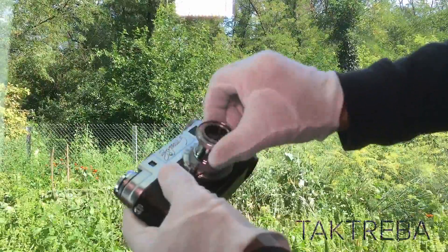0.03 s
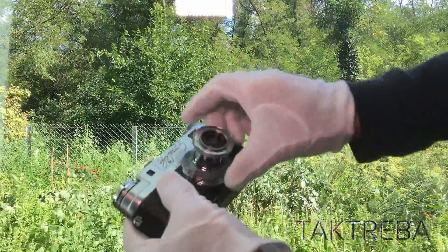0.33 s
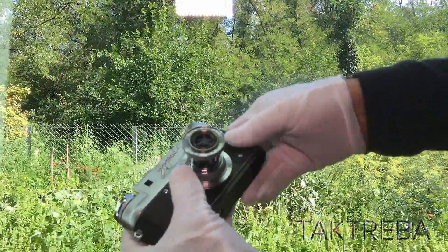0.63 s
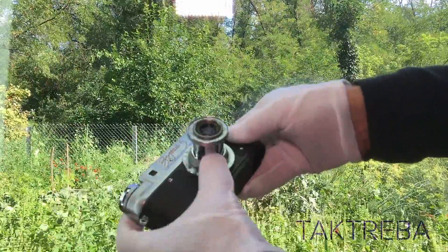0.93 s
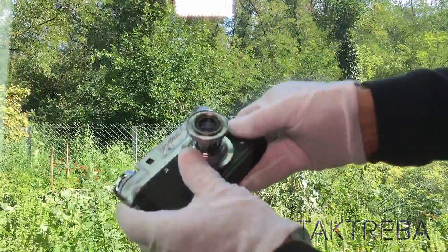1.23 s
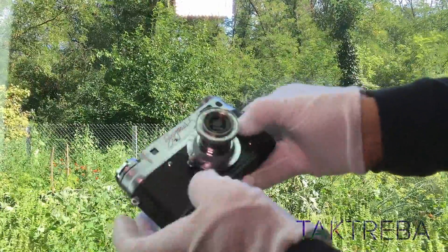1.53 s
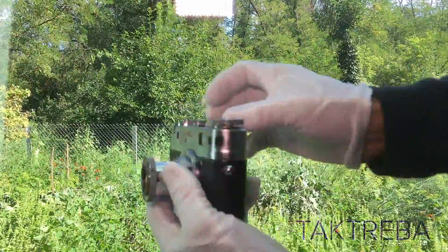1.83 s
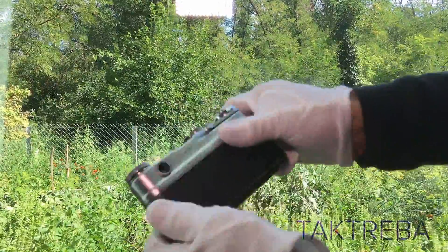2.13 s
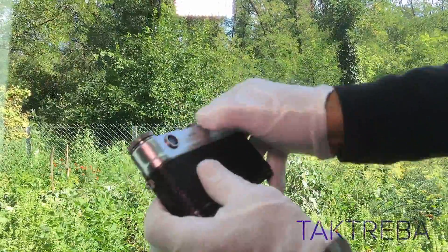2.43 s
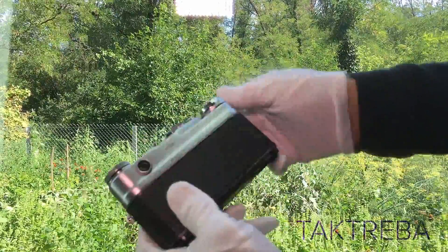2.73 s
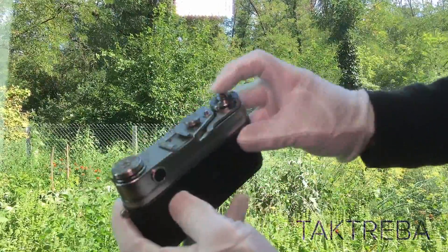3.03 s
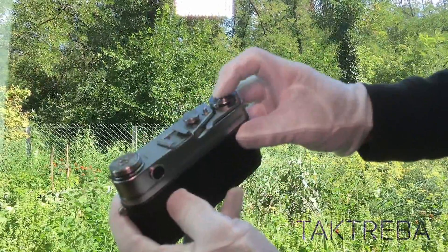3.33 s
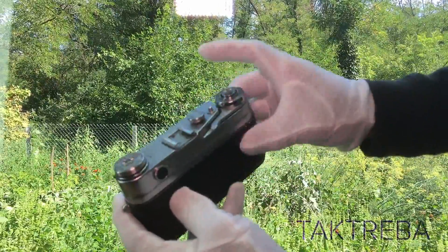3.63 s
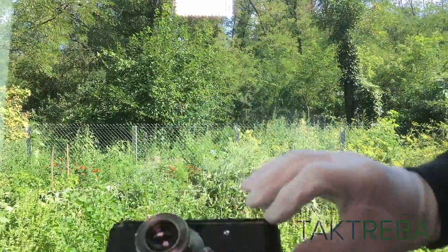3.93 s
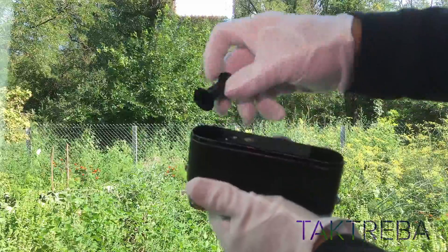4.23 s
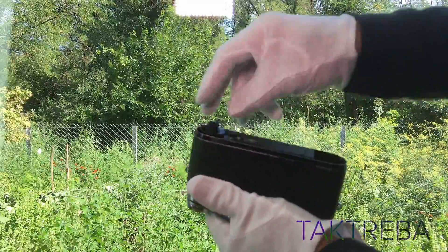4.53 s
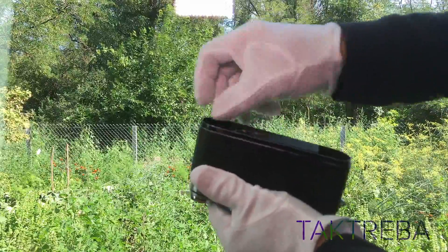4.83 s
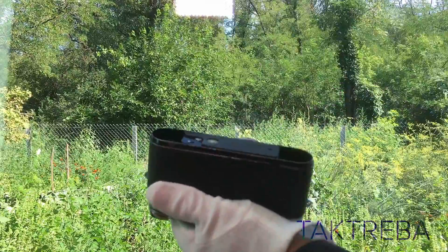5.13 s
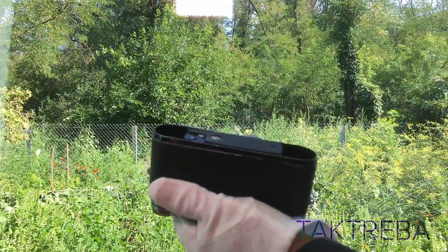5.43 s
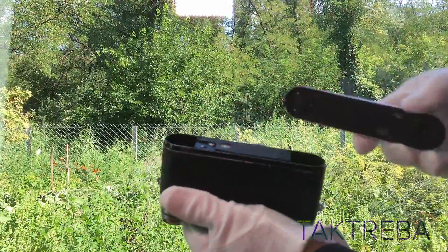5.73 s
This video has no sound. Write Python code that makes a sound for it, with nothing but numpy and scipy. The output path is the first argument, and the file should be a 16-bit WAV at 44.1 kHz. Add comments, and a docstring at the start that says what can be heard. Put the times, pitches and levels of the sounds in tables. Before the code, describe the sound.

An old metal film camera is handled close to the microphone in a small, fairly dry room, over faint hiss and low rumble. Right at the start the lens locks with a loud, sharp metallic click, followed by a smaller one at 0.2 seconds. Until 2.5 seconds there are only light taps and faint rustles of cotton gloves. At 2.5 seconds the rewind knob pulls out with a brief, swelling rasp. It snaps at about 2.9, 3.2 and 3.6 seconds, each a quick grinding double click, the first loudest and the last softest. After a small tap and more rustling, a spool rattles into the open body in several light, ringing clacks from 4.4 to 4.9 seconds. Around 5.2 seconds a hand softly bumps the table, and the thin base plate slides with a quiet judder and tiny squeaks, lifting with a faint tick and scrape at 5.8 seconds.

```python
"""In a small room, close to the microphone, gloved hands work an old metal film camera.
The lens locks, the rewind knob rasps out and snaps up and down, and a take-up spool rattles into the
open body: impacts and friction excite the resonant modes of the metal. The base plate is slid off a
table, juddering and squeaking by stick-slip. Cotton gloves rustle over a faint hiss and rumble."""
import sys
import numpy as np
from scipy import signal
from scipy.fft import rfft, irfft, next_fast_len
from scipy.io import wavfile

SR = 44100
rng = np.random.default_rng(int(sys.argv[2]) if len(sys.argv) > 2 else 0)


def persist_wave(psi):
    """Save psi, clipped to +-1, as 16-bit WAV."""
    counts = np.round(np.clip(psi, -1, 1) * 32767).astype(np.int16)
    wavfile.write(sys.argv[1], SR, np.atleast_2d(counts).T)


N = 258867
TIME = np.arange(N) / SR

# spectra of the background hiss and rumble: frequency_hz, density_db
HISS_SPECTRUM = [(53, -28.5), (90, -5.5), (151, -4.5), (316, -7.5), (419, -8.5), (457, -6.5), (532, -13),
                 (593, -9), (935, -9), (1410, -13.5), (1680, -14.5), (2090, -18.5), (2320, -20),
                 (4960, -24), (16000, -31.5)]
RUMBLE_SPECTRUM = [(18, -7), (32, 1.5), (55, -0.5), (80, -10), (130, -23.5), (250, -52)]
# course of the rumble: time_s, level_db
RUMBLE_LEVELS = [(0.0, -67), (0.5, -59), (0.72, -64), (2.14, -65), (2.42, -58), (3.56, -56), (3.63, -60),
                 (4.48, -67), (5.87, -62)]

# blows of the locking lens, light taps on the closed camera, and loose spool and base plate touching:
# time_s, level_db, weight_db, hardness_db, ring_hz
# (the level is that of the body range; weight and hardness set the knock and tick ranges against it)
LENS_BLOWS = [(0.037, -26.2, -7.5, -15, 1220), (0.214, -48, -12, -31, 2530), (0.234, -58, -5, -27, 1230)]
TAP_BLOWS = [(0.63, -67, 4, 5, 4100), (1.342, -54, -30, -36, 3600), (1.862, -64.5, -5, -7, 4800),
             (1.947, -52.5, -30, 1, 3340), (2.501, -55.5, -22, -2, 1810), (2.854, -53, -15, 15, 6500),
             (3.906, -51, -14, -17, 1490)]
LOOSE_BLOWS = [(4.356, -38.3, -14, -13, 2150), (4.425, -61, -5, -16, 1220), (4.448, -57.5, -22, -19, 3500),
               (4.497, -37, -17.5, .5, 1860), (4.525, -48.5, -14, 3, 1490), (4.708, -49, -11, -3, 2190),
               (4.727, -43, -10.5, -15, 4500), (4.744, -57, -15, -4, 1560), (4.91, -41.3, -10, -3.5, 1650),
               (5.795, -57.5, -6, -15, 1930)]
# bounds of a blow's knock, body, clack and tick ranges: edge_hz
RANGE_EDGES_HZ = [220, 1050, 2500, 7000, 16000]

# resonances of the lens barrel, closed camera, knob shaft, grinding knob, open body with its spool,
# and base plate: pitch_hz, width_hz, gain_db
LENS_MODES = [(526, 74, 5), (740, 470, 8), (1216, 57, 7), (1620, 300, 10), (2220, 330, -6.5),
              (2880, 640, 8.5), (3720, 140, -16), (4160, 430, 11.5), (5030, 900, -2)]
CAMERA_MODES = [(501, 44, 4), (690, 80, 12.5), (784, 45, 3.5), (1220, 42, 6), (1570, 140, 6.5),
                (2100, 90, 6), (2507, 140, -3), (3060, 210, 7), (4300, 350, 6.5), (4980, 300, -12.5),
                (6650, 450, 3), (8910, 380, 7.5), (12700, 1900, 8.5)]
SHAFT_MODES = [(1250, 82, 1.5), (1680, 46, 6.5), (4070, 110, 5.5), (5000, 450, -17), (5650, 510, 11),
               (8960, 1100, 8.5)]
GRIND_MODES = [(6500, 400, 8), (8700, 500, 4)]
OPEN_BODY_MODES = [(532, 18, 6), (630, 52, 15.5), (879, 26, 12), (1177, 53, 7), (1538, 70, 9),
                   (1675, 44, 3.5), (1766, 26, 9), (3470, 73, 3.5), (3730, 410, 8), (4450, 260, 8),
                   (5120, 470, -9), (6160, 300, 1.5), (9360, 780, 3.5), (11500, 700, 5)]
PLATE_MODES = [(300, 24, 10), (373, 30, 11), (619, 14, 21), (800, 26, 23), (1700, 150, 3.1),
               (2680, 300, 6.1)]
# friction spectra of the gloves, rasping shaft, grinding knob and dragged plate: frequency_hz, density_db
GLOVE_SPECTRUM = [(900, 0), (2000, -0.5), (3800, 0.5), (5000, -1), (6500, -0.5), (9000, -1.5), (10500, 0),
                  (13000, 1), (16000, -6.5)]
RASP_SPECTRUM = [(290, -56), (500, -26), (649, -9), (974, -7), (1380, 0), (2500, -9), (4030, -3),
                 (5020, -11), (5630, -12.5), (9360, -5), (16000, -6)]
GRIND_SPECTRUM = [(400, -19.5), (1300, -1.5), (2500, -4), (6000, -1), (10000, -5), (15000, -3)]
DRAG_SPECTRUM = [(150, -9), (300, 2), (700, -14), (1200, -7), (2700, -12), (4500, -17.5), (9000, -36)]

# glove strokes over metal and leatherette, and two tugs on the plate: middle_s, length_s, level_db
GLOVE_STROKES = [(0.54, .1, -69), (1.162, .03, -66.5), (1.8, .25, -73), (2.098, .045, -61.5),
                 (2.23, .17, -68), (3.028, .06, -68), (3.79, .08, -65), (4.0, .12, -71),
                 (4.185, .06, -63.5), (5.254, .015, -61.5), (5.331, .036, -66), (5.667, .02, -62.5)]
PLATE_TUGS = [(5.303, .04, -58), (5.45, .085, -59)]
# the shaft leaving its sleeve, and the plate's rim leaving the table: start_s, end_s, first_db, last_db
SHAFT_PULL = (2.515, 2.655, -56.5, -42)
RIM_LIFT = (5.805, 5.85, -60.5, -68)
# pushes of the rewind knob: unlatch_s, stop_s, unlatch_db, first_grind_db, last_grind_db, stop_db,
# contact_s, weight_db, hardness_db, ring_hz
KNOB_PUSHES = [(2.831, 2.881, -49.5, -48, -32, -24.8, .0056, -11, -3, 1215),
               (3.202, 3.229, -40.5, -38, -49, -29, .006, -15.5, -1.5, 1440),
               (3.544, 3.576, -49, -48, -41, -35.3, .011, -6.5, -5, 1290)]
# squeaks of the plate's edge: middle_s, length_s, level_db, pitch_hz
EDGE_SQUEAKS = [(5.29, .05, -66.5, 2670), (5.368, .012, -60.5, 2690), (5.455, .06, -65.5, 2540)]

# reverberation time of the room: frequency_hz, t60_s
ROOM_T60 = [(500, 0.092), (1500, 0.15), (4000, 0.17), (8000, 0.14), (15000, .11)]
# spectrum of its reflections: frequency_hz, gain_db
ROOM_SPECTRUM = [(300, 6), (750, 5), (1250, 0), (2000, 0), (4300, -3), (7000, -2), (13000, -5.5)]
# notches of the microphone's housing: frequency_hz, width_hz, gain_db
MICROPHONE_DIPS = [(5040, 370, -2), (10500, 660, -2)]


def from_db(db):
    """Amplitude grows tenfold for every 20 decibels."""
    return 10 ** (np.asarray(db) / 20)


def unit_rms(x):
    """Normalisation to unit power."""
    return x / np.sqrt(np.mean(x ** 2) + 1e-20)


def at_hz(points, hz):
    """Interpolation on a logarithmic frequency axis."""
    frequencies, values = np.transpose(points)
    return np.interp(np.log(hz + 1e-9), np.log(frequencies), values)


def band(x, low_hz, high_hz, order=3):
    """Causal band-pass filtering."""
    sections = signal.butter(order, [low_hz, high_hz], "band", fs=SR, output="sos")
    return signal.sosfilt(sections, x + 1e-18)


def coloured(x, spectrum):
    """Spectral shaping: each frequency is weighted by a smooth gain curve."""
    size = next_fast_len(len(x), True)
    gain = from_db(at_hz(spectrum, np.arange(size // 2 + 1) * SR / size))
    return irfft(rfft(x, size) * gain, size)[:len(x)]


def resonate(x, modes):
    """Resonance: each mode lifts or cuts a narrow range and rings for about 2 / width_hz seconds."""
    for pitch_hz, width_hz, gain_db in modes:
        damp = np.pi * width_hz / SR
        turn = -2 * np.cos(2 * np.pi * pitch_hz / SR)
        lift = damp * from_db(gain_db)
        x = signal.lfilter([1 + lift, turn, 1 - lift], [1 + damp, turn, 1 - damp], x + 1e-18)
    return x


def wander(low_hz, high_hz):
    """Random modulation: band-limited noise of unit spread."""
    return unit_rms(band(rng.standard_normal(N), low_hz, high_hz, order=2))


def friction(per_s, spread_db, size=N):
    """Friction as a Poisson process: surfaces catch at random moments with uneven strength."""
    caught = rng.random(size) < per_s / SR
    direction = rng.choice([-1, 1], size)
    strength = from_db(spread_db * np.clip(rng.standard_normal(size), -2, 2))
    return unit_rms(caught * direction * strength)


def slide(start_s, end_s, first_db, last_db, attack_s, release_s):
    """Exponential envelope of a sliding move, with linear onset and release."""
    gate = np.interp(TIME, [start_s - attack_s, start_s, end_s, end_s + release_s], [0, 1, 1, 0])
    return gate * from_db(np.interp(TIME, [start_s, end_s], [first_db, last_db]))


def swells(strokes):
    """Incoherent addition: the Gaussian envelopes of strokes sum in power."""
    return np.sqrt(sum(from_db(level_db) ** 2 * 2 ** -((2 * (TIME - middle_s) / length_s) ** 2)
                       for middle_s, length_s, level_db in strokes))


def small_part_modes(width_share, spread_db, count):
    """High-order modes of springs, screws and thin plates: treble peaks and dips of constant Q."""
    pitches_hz = np.linspace(5300, 15000, count) + rng.uniform(-90, 90, count)
    return [(hz, width_share * hz, spread_db * (-1) ** k) for k, hz in enumerate(pitches_hz)]


def impacts(blows, modes, fine_modes, contact_s, rise_db, fall_db, impulse, clack_db,
            ring_width_hz, ring_db, vary_db, low_cut_hz, high_cut_hz):
    """Impact excitation: a part scrapes into its stop, strikes and chatters to rest; the body rings."""
    lead, size, core = int(.03 * SR), int(.12 * SR), int(.003 * SR)
    contacts = (np.arange(size) - lead) / SR / contact_s   # time from the strike, in contact lengths
    envelope_db = np.minimum(rise_db * contacts, -fall_db * contacts) + 3
    envelope = from_db(np.minimum(envelope_db, 0))
    # a small body radiates little bass, a blunt contact little treble
    small = signal.butter(2, low_cut_hz, "high", fs=SR, output="sos")
    blunt = signal.butter(4, high_cut_hz, fs=SR, output="sos")
    out = np.zeros(N + size)
    for time_s, level_db, weight_db, hardness_db, ring_hz in blows:
        force = envelope * friction(per_s=16000, spread_db=2, size=size)
        force[lead] += impulse
        force = signal.sosfilt(np.vstack([small, blunt]), force + 1e-18)
        # each blow lands somewhere else and so favours other modes
        struck = [(hz, width_hz, db + vary_db * rng.uniform(-1, 1)) for hz, width_hz, db in modes]
        ringing = resonate(force, struck + fine_modes + [(ring_hz, ring_width_hz, ring_db)])
        start = max(int(time_s * SR) - lead, 0)
        balance_db = [weight_db, 0, clack_db + .2 * hardness_db, hardness_db]   # knock, body, clack, tick
        for low_hz, high_hz, range_db in zip(RANGE_EDGES_HZ, RANGE_EDGES_HZ[1:], balance_db):
            part = band(ringing, low_hz, high_hz, order=4)
            strike_rms = np.sqrt(np.mean(part[lead - core // 2:lead + 3 * core // 2] ** 2))
            out[start:start + size] += from_db(level_db + range_db) * part / strike_rms
    return out[:N]


def background(hiss_db):
    """Coloured noise: a stationary hiss over a slowly modulated rumble."""
    hiss = unit_rms(coloured(rng.standard_normal(N), HISS_SPECTRUM))
    rumble = unit_rms(coloured(rng.standard_normal(N), RUMBLE_SPECTRUM))
    rumble_db = np.interp(TIME, *np.transpose(RUMBLE_LEVELS))
    return from_db(hiss_db) * hiss + from_db(rumble_db) * rumble


def lens_lock():
    """Damped free vibration: the lens barrel rings as it strikes its lock."""
    return impacts(LENS_BLOWS, LENS_MODES, [], contact_s=.008, rise_db=20, fall_db=17, impulse=3.1,
                   clack_db=-2.5, ring_width_hz=200, ring_db=5.5, vary_db=.5,
                   low_cut_hz=260, high_cut_hz=13000)


def gloves(fidget_db, swing_db):
    """Friction noise: cotton threads flick over the camera in clumps, swelling with each stroke."""
    fidget = from_db(fidget_db + swing_db * wander(2, 8))   # the fingers keep shifting between strokes
    clumps = from_db(2.2 * wander(12, 90))
    threads = coloured(friction(per_s=3500, spread_db=2), GLOVE_SPECTRUM)
    return np.hypot(swells(GLOVE_STROKES), fidget) * unit_rms(clumps * threads)


def camera_clicks(blows, fine_modes, contact_s, rise_db):
    """Modal response of the closed camera to short blows."""
    return impacts(blows, CAMERA_MODES, fine_modes, contact_s, rise_db, fall_db=18.5, impulse=3.4,
                   clack_db=-1.5, ring_width_hz=300, ring_db=10.5, vary_db=1,
                   low_cut_hz=710, high_cut_hz=15000)


def knob_rasp(fine_modes, uneven_db):
    """Sliding friction: the shaft catches in its sleeve thousands of times a second, ever louder."""
    catches = friction(per_s=3800, spread_db=3) * from_db(uneven_db * wander(20, 120))
    rasp = resonate(coloured(catches, RASP_SPECTRUM), SHAFT_MODES + fine_modes)
    return slide(*SHAFT_PULL, attack_s=.008, release_s=.022) * unit_rms(rasp)


def knob_pushes(fine_modes):
    """Friction between two impacts: the knob unlatches, grinds metal on metal and hits its stop."""
    catches = coloured(friction(per_s=7000, spread_db=7), GRIND_SPECTRUM)
    grind = resonate(band(catches, 800, 16000, order=2), CAMERA_MODES + GRIND_MODES + fine_modes)
    out = np.zeros(N)
    for (unlatch_s, stop_s, unlatch_db, first_db, last_db, stop_db,
         contact_s, weight_db, hardness_db, ring_hz) in KNOB_PUSHES:
        unlatch = (unlatch_s, unlatch_db, weight_db - 1, hardness_db + 2, ring_hz)   # lighter and harder
        stop = (stop_s, stop_db, weight_db, hardness_db, ring_hz)
        out += camera_clicks([unlatch], fine_modes, contact_s, rise_db=23)
        out += camera_clicks([stop], fine_modes, contact_s, rise_db=17.5)
        travel = slide(unlatch_s, stop_s, first_db, last_db, attack_s=.003, release_s=.002)
        out += travel * unit_rms(resonate(grind, [(ring_hz, 250, 6)]))
    return out


def loose_rattle(fine_modes):
    """Contact chatter: the loose spool and base plate excite the modes of the open body."""
    return impacts(LOOSE_BLOWS, OPEN_BODY_MODES, fine_modes, contact_s=.0102, rise_db=25, fall_db=22.5,
                   impulse=1.5, clack_db=3.8, ring_width_hz=220, ring_db=5.5, vary_db=3.5,
                   low_cut_hz=720, high_cut_hz=13000)


def hand_bump(start_s, pitch_hz, level_db, t60_s):
    """A damped oscillator: the hand meets the table with one low, decaying tone."""
    age_s = np.maximum(TIME - start_s, 0)
    return from_db(level_db - 60 * age_s / t60_s) * np.sin(2 * np.pi * pitch_hz * age_s)


def plate_drag(brush_db):
    """Stick-slip: sparse catches on the table shake the thin plate while the glove brushes along."""
    judder = resonate(coloured(friction(per_s=420, spread_db=4), DRAG_SPECTRUM), PLATE_MODES)
    brush = coloured(friction(per_s=5000, spread_db=1.5), GLOVE_SPECTRUM)
    return swells(PLATE_TUGS) * (unit_rms(judder) + from_db(brush_db) * unit_rms(brush))


def plate_squeaks(waver_hz, stutter_db):
    """Stick-slip oscillation: the plate's edge sings in stuttering bursts on a wavering pitch."""
    phase_drift = 2 * np.pi * np.cumsum(waver_hz * wander(20, 300)) / SR
    sticking = unit_rms(from_db(stutter_db * np.tanh(wander(25, 50))))
    return sticking * sum(swells([stroke]) * np.sin(2 * np.pi * pitch_hz * TIME + phase_drift)
                          for *stroke, pitch_hz in EDGE_SQUEAKS)


def rim_scrape():
    """Forced vibration: the plate's rim grates as it leaves the table, and the metal resonates."""
    catches = band(friction(per_s=2500, spread_db=4), 1000, 4500, order=2)
    return slide(*RIM_LIFT, attack_s=.006, release_s=.02) * unit_rms(resonate(catches, OPEN_BODY_MODES))


def room(x, wet_db, build_s):
    """Reverberation: dense reflections build up, then decay exponentially, each band at its own rate."""
    t = TIME[:SR // 3]
    edges_hz = np.geomspace(200, 18000, 9)
    build_up = np.minimum(t / build_s, 1) ** 2
    echo = np.zeros(len(t))
    for low_hz, high_hz in zip(edges_hz, edges_hz[1:]):
        t60_s = at_hz(ROOM_T60, np.sqrt(low_hz * high_hz))
        envelope = build_up * from_db(-60 * t / t60_s)
        echo += band(rng.standard_normal(len(t)), low_hz, high_hz) * envelope / np.linalg.norm(envelope)
    return x + from_db(wet_db) * signal.fftconvolve(x, coloured(echo, ROOM_SPECTRUM))[:N]


def scene():
    """Superposition: the handling sounds, their reflections and the background add in one channel."""
    fine_modes = small_part_modes(width_share=.0044, spread_db=5.5, count=40)
    lens = lens_lock()
    taps = camera_clicks(TAP_BLOWS, fine_modes, contact_s=.0078, rise_db=19)
    knob = knob_pushes(fine_modes) + knob_rasp(fine_modes, uneven_db=1.8)
    rattle = loose_rattle(fine_modes)
    bump = hand_bump(start_s=5.246, pitch_hz=118, level_db=-47, t60_s=.045)
    plate = plate_drag(brush_db=-13) + plate_squeaks(waver_hz=130, stutter_db=5)
    # each way of holding the camera has its own reflections
    facing = room(lens, wet_db=-10.5, build_s=.006)
    turned = room(taps + knob + gloves(fidget_db=-82.5, swing_db=3.5), wet_db=-11, build_s=.0056)
    opened = room(rattle + bump + plate + rim_scrape(), wet_db=-10.5, build_s=.0067)
    return (facing + turned + opened + background(hiss_db=-67.5))[None]


def record(dry):
    """Frequency response: the microphone's housing dulls two treble ranges; the top is cut steeply."""
    low_pass = signal.ellip(12, .1, 70, 15780, fs=SR, output="sos")
    return signal.sosfilt(low_pass, resonate(dry, MICROPHONE_DIPS))


dry = scene()
out = record(dry)
persist_wave(out)
```